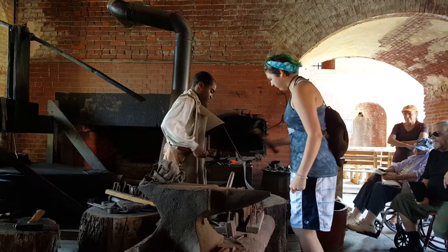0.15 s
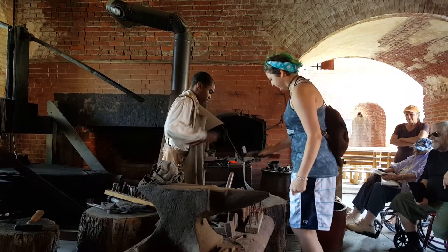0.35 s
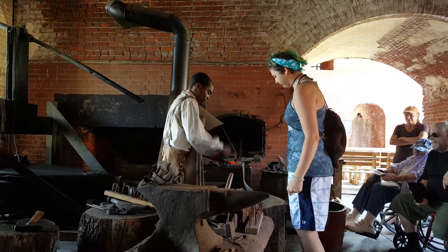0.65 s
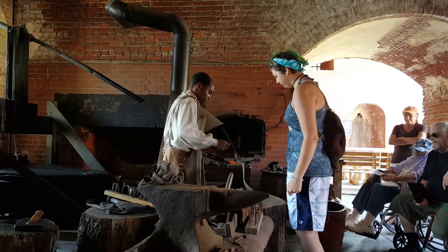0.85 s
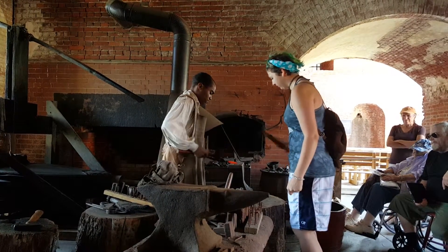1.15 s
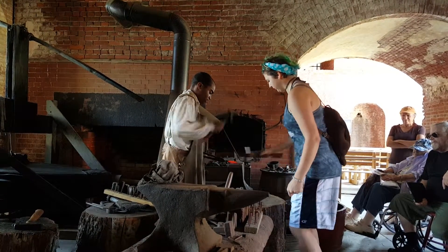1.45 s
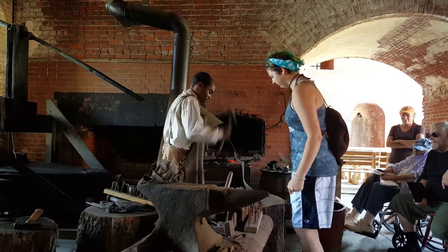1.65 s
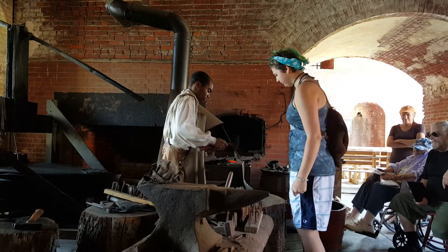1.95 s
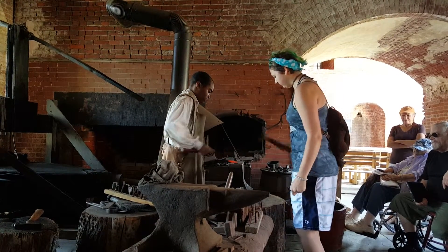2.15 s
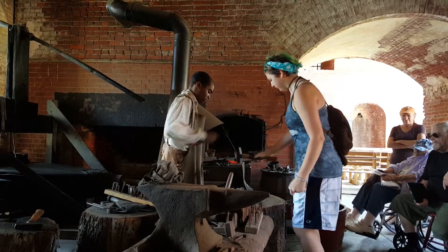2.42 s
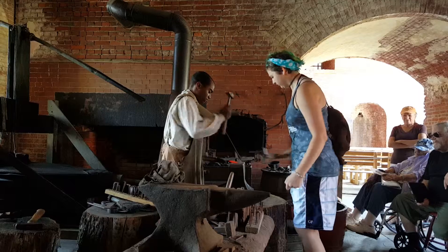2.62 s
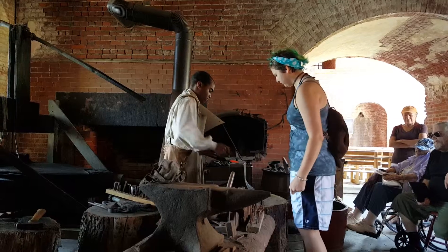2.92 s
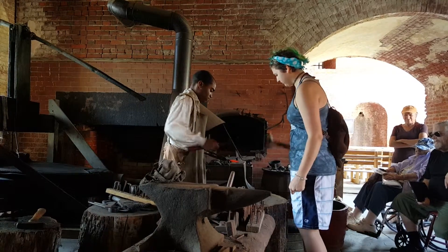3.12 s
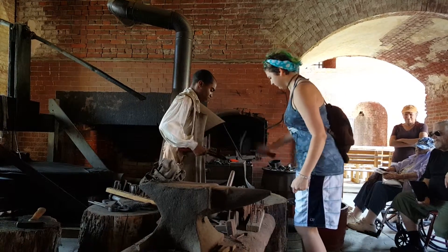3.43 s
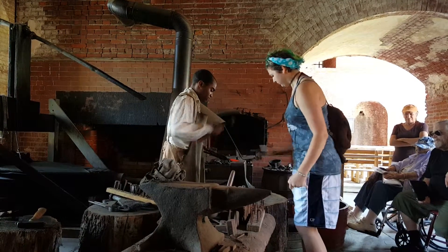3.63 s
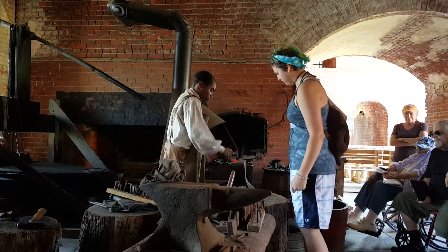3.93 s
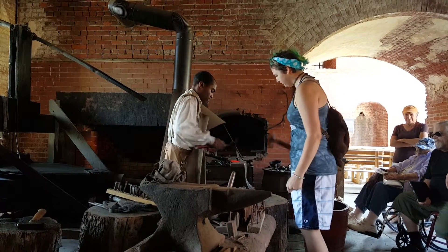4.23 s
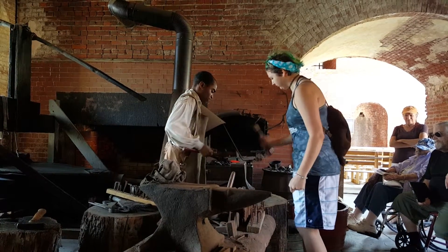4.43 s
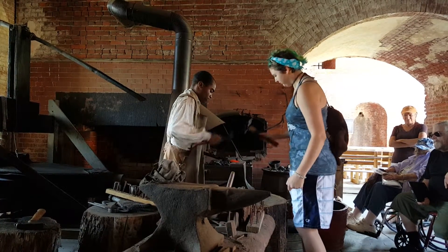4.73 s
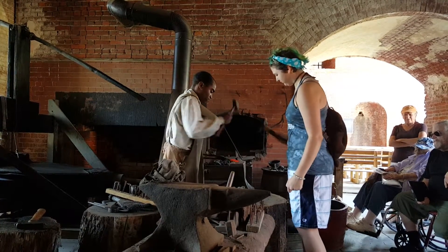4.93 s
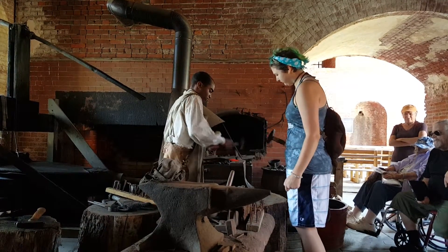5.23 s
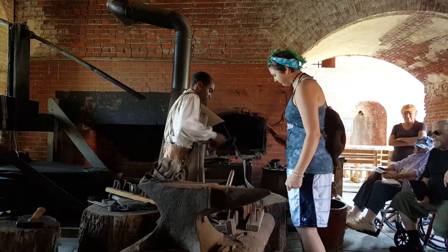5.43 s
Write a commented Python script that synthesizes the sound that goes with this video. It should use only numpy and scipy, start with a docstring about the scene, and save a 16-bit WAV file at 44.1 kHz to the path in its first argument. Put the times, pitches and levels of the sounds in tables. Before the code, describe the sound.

Hammering on an anvil in a reverberant brick vault, heard in stereo from some steps away. The dying tail of an earlier blow is present at the start, with a light tong tick at 0.1 s. Blows land at about 0.37, 0.77, 1.45, 1.82, 2.5, 2.9, 3.55, 4.0, 4.65 and 5.2 s, alternating shorter and longer gaps. Each is a hard crack with close wall slaps, a clear high steel ring that beats and wavers, a low wooden thump and a boomy echo fading in roughly half a second. Brightness and ring vary from hit to hit; the one near 2.5 s is duller and the last is clearly softer. Small bright tong taps tick between blows, notably near 1.4, 2.1 and a pair at 4.25 s. A barely audible hiss of sliding iron comes around 4.4 s. Fire and draught rumble softly underneath, swelling and sinking. Loud hits are lightly compressed.

```python
"""A smith hammers hot iron on an anvil under a brick vault, heard some steps away by two microphone ports.
Each blow is a crack of noise, paired tones from the anvil, a thump of low tones and a tail of dying noise.
Tongs tick between blows as short bright bursts, and iron once slides on the anvil as a faint hiss.
Behind them fire and draught rumble as noise that swells and sinks.
Gain control holds the loud start of every tail down.
"""
import sys
import numpy as np
from scipy import signal
from scipy.fft import rfft, irfft
from scipy.io import wavfile
from scipy.ndimage import uniform_filter1d

SR = 44100
rng = np.random.default_rng(int(sys.argv[2]) if len(sys.argv) > 2 else 0)


def store_wav(level_fs):
    """Save 16-bit WAV to argv[1]."""
    pcm = np.round(np.clip(np.atleast_2d(level_fs), -1, 1) * 32767)
    wavfile.write(sys.argv[1], SR, pcm.T.astype(np.int16))


N = 245637  # samples in the scene

# Hammer blows; one before t = 0 is heard only by what is left of it. Columns: t/s, thump into the stump level/dB,
# weight level/dB, knock into the anvil level/dB, hardness of the contact level/dB, spot (-1 heel to 1 horn)
HAMMER_BLOWS = [(-.3, -7, -18, -5, -4.5, 0.18), (0.3664, -6, 4, -9.5, -7, -0.047),
                (0.766, -6.5, 1.5, -7.5, -9, 0.16), (1.4484, -3, 4.5, -10, -7.5, 0.2),
                (1.822, -9, 1, -8.5, -11, -0.62), (2.4947, -6.5, 2.5, -14, -14.5, 0.11),
                (2.879, -5.5, 5, -13.5, -9, .8), (3.556, -7.5, 1.5, -6, -9.5, 0.053),
                (4.006, -7, 0.5, -9.5, -9, -0.083), (4.637, -10.5, 1, -11.5, -4, -0.57),
                (5.225, -13, -5.5, -21, -16.5, 0.27)]


def hammering(mix):
    """Every blow excites the same vault, so part of the tail and all the low tones come back each time."""
    room, low_tones = fresh(SR), boom()
    for start_s, *settings in HAMMER_BLOWS:
        add(mix, start_s, blow(room, low_tones, *settings))


def blow(room, low_tones, thump_db, weight_db, knock_db, hardness_db, spot):
    """One hit drives the crack, the ring of the anvil, the boom and the tail of the vault."""
    strength_db = contact(thump_db, weight_db, knock_db, hardness_db, spot)
    out = tail(room, strength_db)
    out += amp(thump_db - 11.5) * low_tones
    add(out, 0, amp(4) * crack(strength_db))
    return out + anvil_ring(strength_db, spot)


SPARKLE_DB = 5.5  # extra top above the hardness, for a blow in the middle
SPARKLE_HORN_DB = 4  # more top when the spot moves from the middle to the horn


def contact(thump_db, weight_db, knock_db, hardness_db, spot):
    """The thump drives the bass, weight the middle, the knock the ringing range, hardness the top."""
    top_db = hardness_db + SPARKLE_DB + SPARKLE_HORN_DB * spot
    points = [(250, thump_db), (500, weight_db), (1200, weight_db), (2200, knock_db),
              (3600, hardness_db), (6000, hardness_db), (8000, top_db)]
    return lambda hz: read(points, hz)


CHANCE_HZ, CHANCE_DB = 4400, 3  # above this the nodes lie close, so each blow excites the modes by chance
# Pitches of the anvil's ways of vibrating (modes). Column: f/Hz
ANVIL_PITCHES = (1839, 2057, 2660, 3582, 4324, 4505, 5222, 5455, 5520, 5980, 6825, 7157, 7866, 9100, 9795,
                 10092, 10822, 11770, 12250)
# One row per pitch. Each tone beats with a close partner; a minus share means opposite sign.
# Columns: level/dB, t60/s (time to fall 60 dB), left-right level/dB, split to the partner f/Hz,
# partner's share left, partner's share right, gain from the middle to the horn level/dB
ANVIL_TONES = [(-21, 0.48, 0.5, 3.3, 1, -0.25, 12.5), (-4, .54, -6, 3.4, -1, -.4, 1),
               (-11.5, .5, 0, 3.4, -.9, -.5, 0), (-12, 0.44, 0.5, 3.8, 1, 0.78, -7.5),
               (-19, 0.45, -13.5, 2.3, .3, 0.25, 0.5), (-25.5, .22, -6, 5, .05, .05, -9.5),
               (-17, .28, -7, 5, .05, .05, -5), (-20, .25, -5.5, 5, .05, .05, -9),
               (-22, .5, -.5, 6, .1, .1, 3), (-25, .26, -2.5, 5, .05, .05, -7),
               (-28, .3, 1, 5, .05, .05, 0), (-27, .28, 2.5, 5, .05, .05, -3),
               (-27, .24, 4, 5, .05, .05, -2), (-27, .25, 5.5, 30, .5, .5, -1),
               (-23, .2, -3, 5, .05, .05, -4), (-24, .27, -2.5, 5, .05, .05, -2),
               (-24, .27, -.5, 11, .5, .5, -7), (-24, .25, -4, 5, .05, .05, -3),
               (-28.5, .2, -1.5, 40, 0.51, .4, 0)]


def anvil_ring(strength_db, spot):
    """Steel rings in many modes; the spot struck decides how strongly each one sounds."""
    out = np.zeros((2, SR))
    chances = rng.standard_normal(len(ANVIL_TONES))
    for hz, (db, *pair, horn_db), chance in zip(ANVIL_PITCHES, ANVIL_TONES, chances):
        chance_db = CHANCE_DB * chance * (hz > CHANCE_HZ)
        out += mode(hz, strength_db(hz) + db + horn_db * spot + chance_db, *pair)
    return out


WAVER = .16  # share of each echo in the ring
RING_SWELL_S = .014  # time constant of the build-up
PARTNER_FADE_S = .17  # the partners die sooner, so the beating smooths out


def mode(hz, db, t60, lean_db, split_hz, left, right):
    """A dying tone that builds up; echoes, as slowly turning copies, make it waver differently at each port."""
    t = np.arange(SR) / SR
    offset_hz, phase = rng.uniform(-30.6, 18, (2, 4, 1)), rng.random((2, 4, 1))
    echoes = 1 + WAVER * np.exp(2j * np.pi * (offset_hz * t + phase)).sum(1)
    partner = np.exp(2j * np.pi * split_hz * t - t / PARTNER_FADE_S)
    pair = 1 + np.array([[left], [right]]) * partner
    # the ports hear the ring a quarter turn apart
    tone = np.exp(2j * np.pi * hz * t) * np.array([[1j], [1]])
    swell = 1 - np.exp(-t / RING_SWELL_S)
    level = amp(db - 60 * t / t60 + lean_db * np.array([[.5], [-.5]]))
    return level * swell * (echoes * pair * tone).imag


CRACK_DELAY_S = .0004
# Colour of the crack, as noise level per Hz. Columns: f/Hz, level/dB
CRACK_COLOUR = [(180, -27), (300, 5), (1340, -19), (2400, 11.5), (3350, -9.5), (5430, 1), (6850, -9.5),
                (12500, -1), (13500, -0.5), (16000, -27.5)]
# Echoes from the nearest walls, counted from the crack. Columns: t/s, level/dB
WALL_ECHOES = [(.0023, -5), (.009, -5), (.019, -12), (.027, -12)]


def crack(strength_db):
    """A noise burst of a few milliseconds, repeated duller by the nearest walls."""
    t = np.arange(512) / SR
    burst = ports(fresh(len(t)), lambda hz: read(CRACK_COLOUR, hz), alike=.5, strength_db=strength_db)
    burst = burst * amp(-60 * t / .01) * np.minimum(t / .0009, 1)
    dull = signal.lfilter(*signal.butter(1, 5000, fs=SR), burst)
    out = np.zeros((2, 2048))
    add(out, CRACK_DELAY_S, burst)
    for echo_s, db in WALL_ECHOES:
        add(out, CRACK_DELAY_S + echo_s, amp(db) * dull)
    return out


# Low modes of the vault, started alike by every blow. Columns: f/Hz, level/dB, t60/s, sign at the ports
LOW_MODES = [(61.4, -20, .5, 1), (69.5, -10, .9, -1), (76, -13, .9, 1), (91.5, -3, .22, -1),
             (99.1, -9.5, .9, -1), (103.9, -7, .8, -1), (112.1, -17, .9, 1), (125.6, -3.5, .5, -1),
             (132.9, -1.5, .42, -1), (146.3, -6, .5, -1), (158.8, 0, .35, -1), (177.2, -5.5, .5, 1),
             (195.5, -6.5, .32, 1), (213.7, -12, .5, -1), (232.5, -18, .45, 1), (258.3, -8, .38, -1),
             (312.5, -6.5, .24, 1), (321.6, -3, .21, -1)]


def boom():
    """The stump's thump starts the low modes of the vault together, each a dying sine."""
    t = np.arange(SR) / SR
    ring = 0
    for hz, db, t60, sign in LOW_MODES:
        ring = ring + sign * amp(db - 60 * t / t60) * np.sin(2 * np.pi * (hz * t + .15))
    return ring * (1 - np.exp(-t / 0.012))


# Colour of the tail, as noise level per Hz. Columns: f/Hz, level/dB
TAIL_COLOUR = [(40, -0.5), (141, 9.5), (315, 0), (395, -27.5), (723, -25.5), (1060, -28.5), (1900, -8),
               (2700, -7), (3050, -17.5), (4430, -7), (5500, -13), (6100, -23), (12400, -20),
               (15200, -26.5), (16400, -66)]
# How long each pitch takes to fall 60 dB. Columns: f/Hz, t60/s
TAIL_FADE = [(50, 0.12), (130, 0.74), (350, 0.48), (900, 0.53), (2400, 0.42), (5000, 0.36), (9000, 0.32),
             (15000, 0.2)]
# How slowly each pitch fills the vault. Columns: f/Hz, time constant t/s
TAIL_FILL = [(60, 0.0087), (200, 0.053), (800, 0.0017), (8000, 0.019)]
# Part of the tail that all blows have in common. Columns: f/Hz, share (0 to 1)
TAIL_SHARED = [(300, .9), (1000, .75), (2000, .4), (5000, .15)]


def tail(room, strength_db):
    """Echoes in the vault blur into noise; each band fills the vault and dies at its own speed."""
    hz = np.fft.rfftfreq(SR, 1 / SR)
    share = read(TAIL_SHARED, hz)
    spectra = share * room + np.sqrt(1 - share ** 2) * fresh(SR)
    # lower down the modes stand apart and ring on their own
    spectra = spectra * amp(read([(300, -12), (370, 0)], hz))
    noise = ports(spectra, lambda hz: read(TAIL_COLOUR, hz) + vault_modes(hz) + clang(hz),
                  strength_db=strength_db)
    # shape every band over time
    hz, t, bands = signal.stft(noise, SR, nperseg=256, noverlap=192)
    fade = amp(-60 * t / read(TAIL_FADE, hz)[:, None])
    fill = 1 - np.exp(-t / read(TAIL_FILL, hz)[:, None])
    out = signal.istft(bands * fade * fill, SR, nperseg=256, noverlap=192)[1][:, :SR]
    return out * np.minimum(np.arange(SR) / (0.00063 * SR), 1)


# Resonances of the vault. Columns: f/Hz, width f/Hz, level/dB
VAULT_PEAKS = [(405.3, 3.5, 12), (441.9, 48, 13.5), (648, 23, 3.5), (710, 73, 6.5), (776, 16, 2),
               (930, 6.4, 17), (830, 140, 3)]


def vault_modes(hz):
    """The air in the vault resonates, which adds peaks in dB to the tail."""
    return sum(db / (1 + (2 * (hz - f) / width) ** 2) for f, width, db in VAULT_PEAKS)


CLANG_DB, CLANG_WIDTH_HZ = 2.5, 300


def clang(hz):
    """Hammer and hot iron clang in other treble bands at every blow: random gains in dB."""
    bands = np.arange(0, SR / 2, CLANG_WIDTH_HZ)
    gains = rng.standard_normal(len(bands)) * (bands > CHANCE_HZ)
    return CLANG_DB * np.interp(hz, bands, gains)


# Taps of the tongs. Columns: t/s, level/dB
TONG_TAPS = [(0.1085, -40.5), (0.6414, -49.5), (1.3722, -52), (1.415, -42), (2.073, -45.5), (2.387, -59),
             (2.4394, -69), (2.729, -52), (3.311, -55), (3.335, -64), (3.414, -56.5), (4.2319, -45),
             (4.257, -43)]


def tongs(mix):
    """The tongs tap lightly, mostly between blows."""
    for start_s, db in TONG_TAPS:
        add(mix, start_s, tick(db))


def tick(db):
    """A light tap of metal: a bright click of noise with a short halo."""
    t = np.arange(4096) / SR
    colour = [(1500, -20.5), (4000, -6), (9000, 3.5), (14500, -5), (16000, -31)]  # f/Hz, level/dB
    click = ports(fresh(len(t)), lambda hz: read(colour, hz))
    fade = amp(-60 * t / 0.016)
    halo = amp(-14.5 - 60 * t / 0.09)
    return amp(db) * click * np.minimum(t / 0.0016, 1) * (fade + halo)


SCRAPE_S, SCRAPE_DB, SCRAPE_LENGTH_S = 4.385, -60, .25
SCRAPE_RISE_S, SCRAPE_HOLD_S, SCRAPE_FADE_DB_PER_S = .07, .02, 60


def scrape(mix):
    """Iron slides on the anvil: a faint bright hiss that rises, holds and fades."""
    t = np.arange(2 * round(SCRAPE_LENGTH_S * SR / 2)) / SR
    colour = [(2500, -9.0), (4800, 1.0), (6500, -11.0), (12000, -11.5), (15500, -26)]  # f/Hz, level/dB
    hiss = ports(fresh(len(t)), lambda hz: read(colour, hz))
    fade_db = SCRAPE_FADE_DB_PER_S * np.maximum(t - SCRAPE_RISE_S - SCRAPE_HOLD_S, 0)
    level = amp(SCRAPE_DB - fade_db) * np.minimum(t / SCRAPE_RISE_S, 1)
    add(mix, SCRAPE_S, level * hiss * signal.windows.tukey(len(t), .2))


# Colour of the rumble, as noise level per Hz. Columns: f/Hz, level/dB
AIR_COLOUR = [(18, -48), (30, -13), (79, 1.5), (280, -0.5), (499, -11), (632, -19), (702, -10.5),
              (937, -20.5), (1070, -16), (1430, -20), (2750, -25), (3140, -33), (5170, -31), (6380, -42),
              (16000, -46.5)]
# Slow course of the rumble, before its quicker swelling. Columns: t/s, level/dB
AIR_LEVEL = [(0, -41), (.35, -45.5), (1.1, -47), (1.4, -45), (2.2, -55), (2.45, -53.5), (3.3, -48),
             (3.55, -45.5), (4.5, -50.5), (5.1, -56.5), (5.6, -48)]


def air():
    """The low rumble of fire and draught in the vault: noise swelling and sinking at many rates at once."""
    t = np.arange(N) / SR
    rates_hz = np.geomspace(1.5, 15, 12)
    swell = evened(sum(np.sin(2 * np.pi * (f * t + rng.random())) / np.sqrt(f) for f in rates_hz))
    noise = ports(fresh(6 * SR), lambda hz: read(AIR_COLOUR, hz))[:, :N]
    return noise * amp(np.interp(t, *np.transpose(AIR_LEVEL)) + 1.3 * swell)


# How alike noise is at the two ports. Columns: f/Hz, likeness (0 to 1)
PORT_LIKENESS = [(60, .96), (300, .94), (600, .85), (900, .65), (1400, .1), (3000, 0)]
# Each port has its own cavity peaks. Columns: f/Hz, left-right level/dB
PORT_BALANCE = [(60, 4), (700, -1), (1400, 0.5), (2300, -13), (3400, -5), (4000, -5.5), (5000, -9.5),
                (6400, 1.5), (8000, 3), (9900, 1.5), (11200, 5), (12400, -16.5), (14000, 4), (15300, -1.5)]


def ports(noise, colour_db, alike=0., strength_db=lambda hz: 0):
    """Two noise spectra become sound at two ports, alike in the bass; rms about 1 before strength."""
    (a, b), size = noise, 2 * noise.shape[1] - 2
    hz = np.fft.rfftfreq(size, 1 / SR)
    same = np.clip(read(PORT_LIKENESS, hz) + alike, 0, 1)
    lean = amp(read(PORT_BALANCE, hz) / 2)
    left = a * lean
    right = (same * a + np.sqrt(1 - same ** 2) * b) / lean
    spectra = np.array([left, right]) * amp(colour_db(hz))
    # even out real and imaginary parts together
    spectra = evened(spectra.view(float)).view(complex)
    return irfft(spectra * np.sqrt(size / 2) * amp(strength_db(hz)), size)


def fresh(size):
    """Two unrelated spectra of noise."""
    return rfft(rng.standard_normal((2, size)))


def amp(db):
    """Turn dB into a factor."""
    return 10 ** (np.asarray(db) / 20)


def evened(x):
    """Scale to rms 1."""
    return x / np.sqrt(np.mean(x ** 2) + 1e-20)


def read(points, hz):
    """Read a curve at any frequency, with straight lines over log frequency."""
    f, value = np.transpose(points)
    return np.interp(np.log(hz + 1), np.log(f + 1), value)


def add(mix, s, sound):
    """Lay a sound into the mix at s seconds, cutting what falls outside."""
    at = round(s * SR)
    sound = sound[:, max(-at, 0):]
    part = mix[:, max(at, 0):][:, :sound.shape[1]]
    part += sound[:, :part.shape[1]]


def scene():
    """Hammering, tongs and scrape over the rumble."""
    mix = air()
    hammering(mix)
    tongs(mix)
    scrape(mix)
    return mix


EDGE_HZ = 16560  # upper band limit


def record(dry):
    """Gain control falls within milliseconds and recovers in the tail; then soft clipping and band limits."""
    power = uniform_filter1d((dry ** 2).mean(0), 300, origin=149)  # mean of the latest 300 samples
    power_db = 10 * np.log10(abs(power) + 1e-12)
    # the sensed level jumps up with the sound but sinks by at most 270 dB per second
    fall_db = np.arange(N) * 270.0 / SR
    sensed_db = np.maximum.accumulate(power_db + fall_db) - fall_db
    over_db = np.maximum(sensed_db + 29.5, 0)
    # each dB over the threshold takes 0.2 dB off the gain
    gain = amp(1.0 - 0.2 * uniform_filter1d(over_db, 60))
    held = np.tanh(dry * gain)
    # the capsule drops the deepest bass
    held = signal.sosfilt(signal.butter(2, 42, "high", fs=SR, output="sos"), held)
    low_pass = signal.firwin(511, EDGE_HZ, window=("kaiser", 9), fs=SR)
    return signal.oaconvolve(held, low_pass[None], "same")


dry = scene()
out = record(dry)
store_wav(out)
```